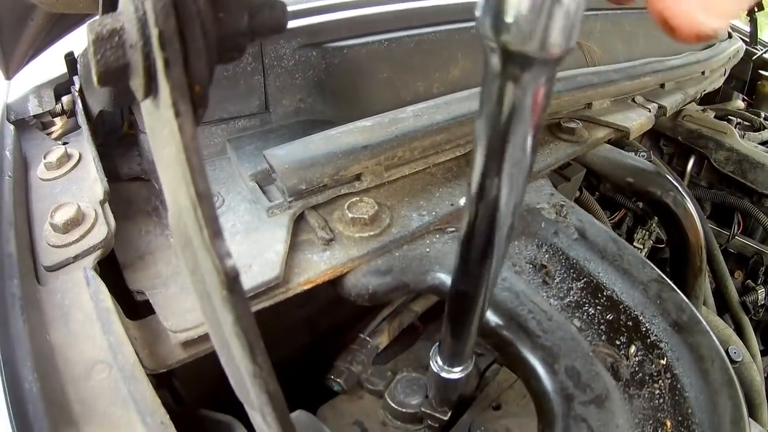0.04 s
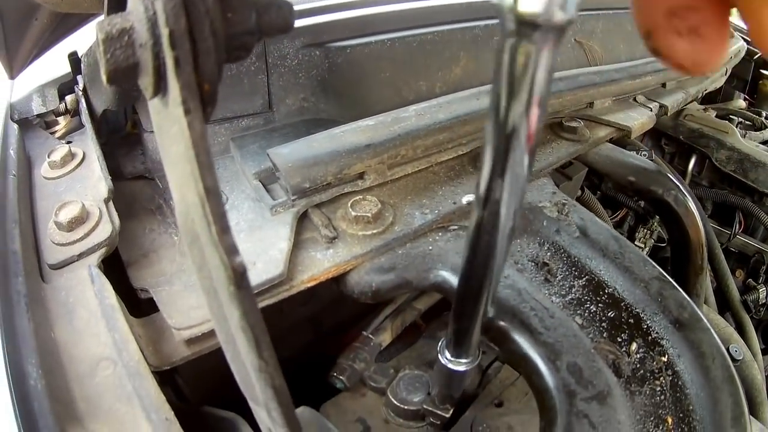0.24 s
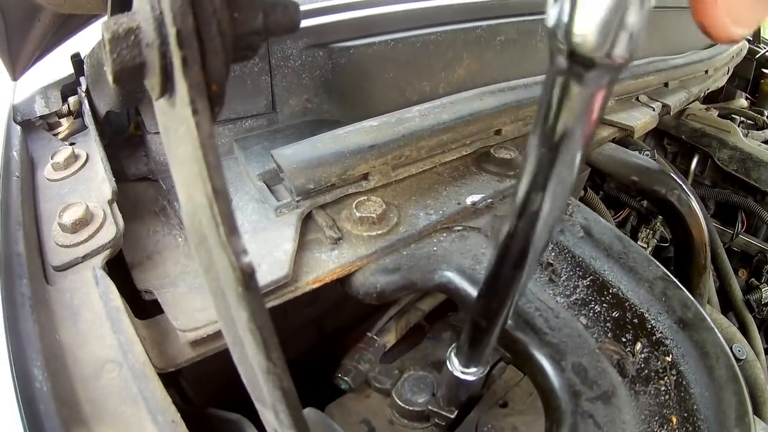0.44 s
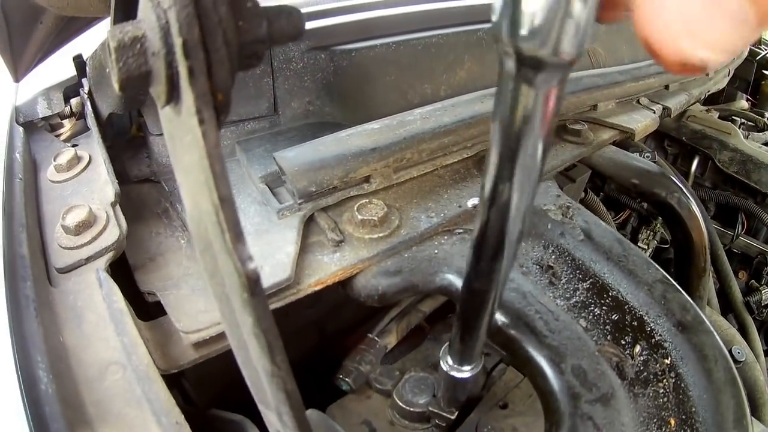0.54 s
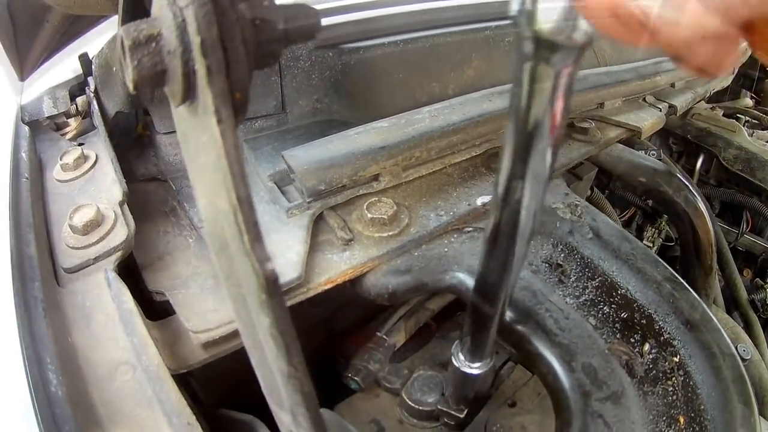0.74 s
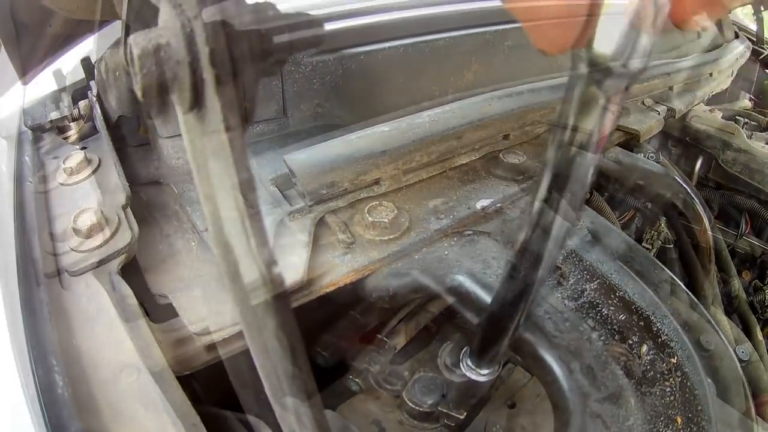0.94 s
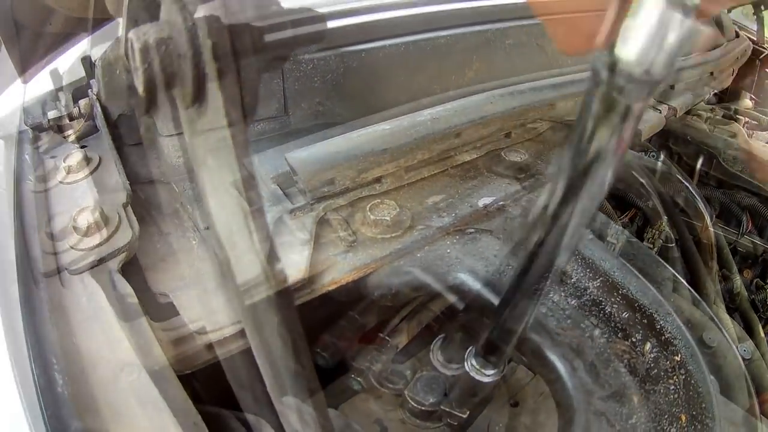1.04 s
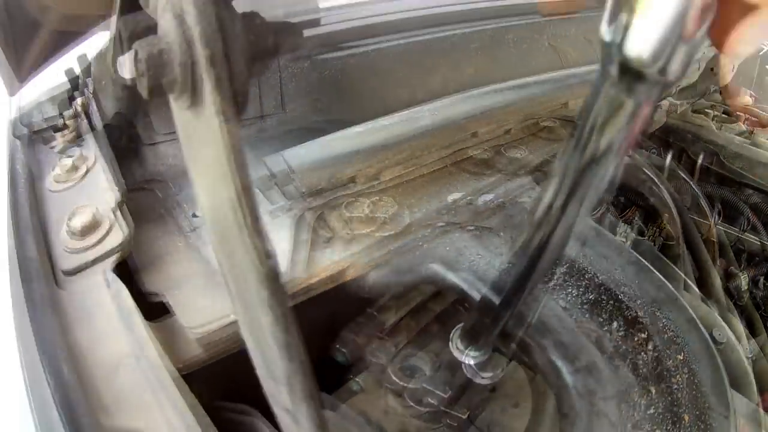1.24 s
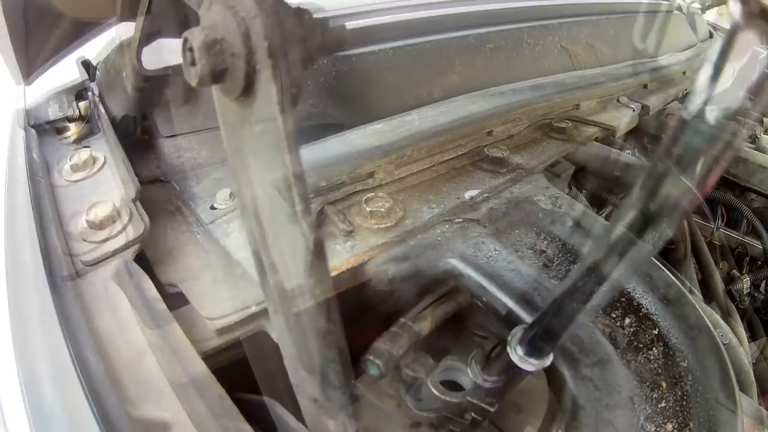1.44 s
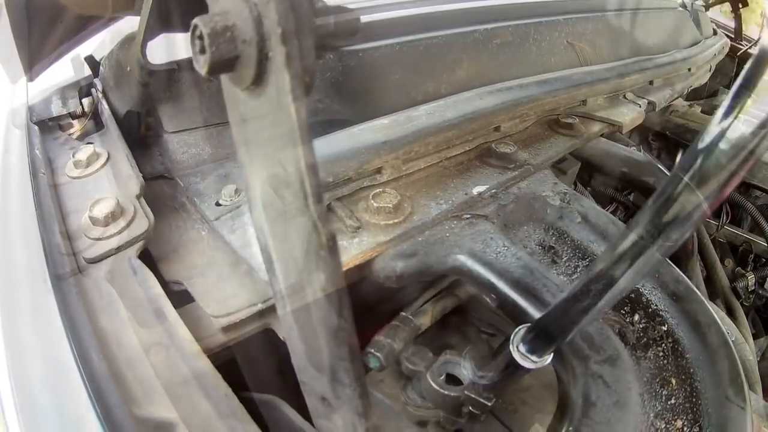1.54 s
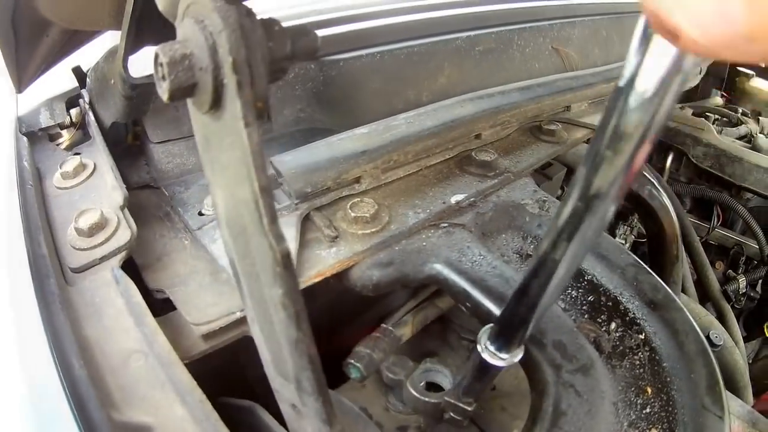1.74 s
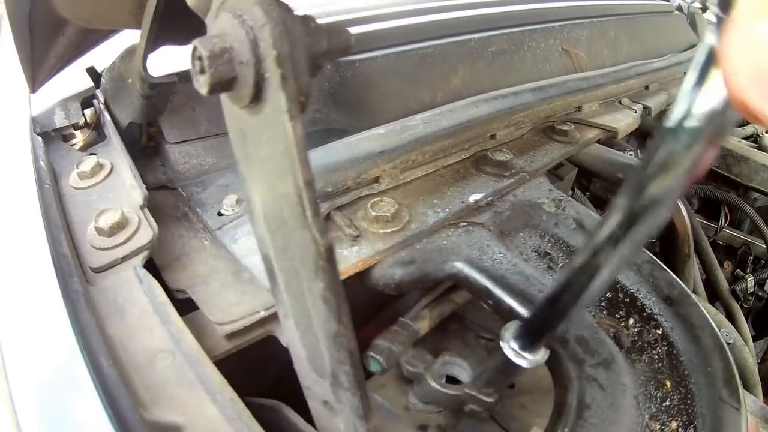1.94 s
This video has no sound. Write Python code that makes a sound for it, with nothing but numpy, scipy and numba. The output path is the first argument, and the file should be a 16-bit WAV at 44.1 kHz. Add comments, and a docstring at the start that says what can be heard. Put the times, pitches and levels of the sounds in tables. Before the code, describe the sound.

A hand ratchet clacks on a nut in an engine bay, heard close. A loud burst of hard knocks and steel ticks comes at 0.22-0.32 seconds, then near quiet; the volume drops at 0.6. Clacks follow at 0.68 and 0.83, a heavy, booming, overloaded thud at 0.98, irregular clicks and light scrapes from 1.15, stronger knocks at 1.4 and 1.95. Faint rattle, low hum, hiss, short garage reverberation.

```python
"""Ratchet in an engine bay

A hand ratchet with a long extension works a nut, close to a small microphone in a garage. Each knock of the
drive is a short pop that excites damped modes of the bodywork; some also set the large panels booming.
Loose steel parts tick and scrape as rapid impacts on the modes of the tool, and faint contacts rattle.
One heavy thud overloads the microphone; a brief reverberation, noise and a hum fill the garage.
The playback volume is turned down part-way, over a steady hiss."""
import sys
import numpy as np
from scipy import signal
from scipy.fft import rfft, irfft
from scipy.io import wavfile
from numba import njit

SR = 44100
rng = np.random.default_rng(int(sys.argv[2]) if len(sys.argv) > 2 else 0)


def store_wav(level_fs):
    """Save 16-bit WAV to argv[1]."""
    pcm = np.round(np.clip(np.atleast_2d(level_fs), -1, 1) * 32767)
    wavfile.write(sys.argv[1], SR, pcm.T.astype(np.int16))


N = 88200  # samples: two seconds

# Blow levels apply before tilt, favour and scatter; mode levels are relative within a set.
# Knocks of the drive. Each row: start in seconds, peak of the pop's envelope in dB, pop frequency in Hz,
# bodywork level in dB, bodywork tilt in dB per octave, frequency the struck spot favours in Hz, favour in dB.
KNOCKS = [(0.001, -36, 535, -45.5, -10, 567, 22), (0.147, -55, 920, -47, -7.5, 750, 2),
          (0.2228, -5, 1427, -16.5, 2.5, 519, 5.5), (0.2267, -9, 1230, -18, 4.5, 1177, 6),
          (0.2321, -14, 1440, -22, 3.5, 1440, 4), (0.2500, -16, 930, -25.5, -0.5, 560, -5),
          (0.2930, -28, 1440, -33, -4.5, 750, 10.5), (0.3230, -29.5, 1360, -37.5, -6.5, 1440, 1),
          (0.6789, -9.5, 1342, -20, 0.5, 748, 13), (0.7100, -21.5, 1440, -25.5, 5, 1420, 1),
          (0.7500, -59, 770, -36.5, -1.5, 748, 19.5), (0.8070, -32, 1520, -38.5, 9, 748, 10),
          (0.8349, -7, 1542, -22.5, -4.5, 770, 18.5), (0.9820, 8.5, 358, -3.5, -2, 510, -1),
          (0.9900, -4, 966, -11.5, 2, 1074, 4), (1.0070, -2, 976, -10.5, 0.5, 604, 17),
          (1.1470, -31.5, 1370, -36.5, -1, 750, 7.5), (1.2100, -45, 1513, -42, 0, 1440, -1),
          (1.2570, -29.5, 1430, -36, 1.5, 750, 3), (1.2910, -17, 1280, -25.5, -2, 770, 9),
          (1.3230, -25.5, 1440, -34.5, 6.5, 750, 14), (1.371, -29.5, 1440, -33, -2, 750, -7),
          (1.402, -2.5, 1325, -15, 3.5, 1060, -1), (1.4370, -24.5, 1350, -26.5, -4.5, 1440, 11),
          (1.4960, -20, 1300, -27.5, 2, 1340, 12), (1.5170, -24, 1326, -32, -2, 750, -4),
          (1.5720, -23.5, 1400, -25.5, -2, 750, 0), (1.6730, -42, 1800, -40.5, -1, 1840, 4),
          (1.7090, -36.5, 1200, -36.5, -2.5, 560, 4), (1.7510, -28.5, 1340, -37, -4.5, 750, 11),
          (1.8120, -32, 1190, -33.5, 1, 1190, 4), (1.83, -23, 1410, -28.5, 3.5, 750, 3.5),
          (1.8640, -26, 1170, -27, -2, 480, 3), (1.9000, -26.5, 1280, -37.5, 7, 750, 3),
          (1.9450, -1.5, 1310, -11, 1, 900, 6), (1.9590, -6.5, 904, -29, -3.5, 770, -3),
          (1.9910, -39, 900, -25.5, -6.5, 480, 0)]
POP_PEAK_S, POP_SHARPNESS = .0013, 3.6
# Clear modes of the bodywork. Each row: frequency in Hz, level in dB, decay by 60 dB in seconds.
BODY_MODES = [(470.3, -7, 0.13), (531, -5, 0.11), (578.3, -2, 0.043), (604.3, -8, 0.12), (680, -10.5, .15),
              (747.2, 0, 0.097), (781.2, -3, 0.099), (896.4, -5.5, 0.2), (936.5, -4, 0.084),
              (1081.7, -3.5, 0.17), (1189, -6, 0.13), (1376, -12.5, .11), (1453, -9, 0.27), (1577, -9, .1),
              (1690, -21.5, 0.065), (1940, -13.5, 0.089)]
# Outline of the dense modes among them. Each row: frequency in Hz, level in dB, decay by 60 dB in seconds.
BODY_DENSE = [(80.22, -32, 0.25), (170, -24.5, 0.5), (323, -18, 0.32), (604, -9, 0.21), (1160, -17, 0.18),
              (1760, -18.5, 0.15), (2360, -26, 0.05), (3500, -30, 0.082), (5000, -38, 0.047),
              (6742, -50.5, 0.028)]
BODY_RISE_S, BODY_DETUNE = 0.0018, 0.0079  # detuning as a fraction of frequency
BODY_CLEAR_SCATTER_DB, BODY_DENSE_SCATTER_DB = 1, 5.5  # change from blow to blow
SPOT_OCTAVES = .07  # distance at which a spot's favour falls to 1/e

# Booms of the large panels. Each row: start in seconds, level in dB, tilt in dB per octave.
BOOMS = [(0.001, -42, -9), (0.148, -54, 11), (0.223, -37.5, 17), (0.251, -35.5, -10.5), (0.292, -44, -4),
         (0.838, -27.5, -7), (0.854, -34.5, 12), (0.982, -5, 6), (1.029, -14.5, -1), (1.405, -35.5, 10),
         (1.944, -26.5, 10)]
# Modes of the large panels. Each row: frequency in Hz, level in dB, decay by 60 dB in seconds.
PANEL_MODES = [(90.8, -21, 0.1), (111.7, -4, 0.3), (123.5, -2, 0.59), (164.8, -10.5, 0.35),
               (202, -6.5, 0.29), (231.4, 3.5, 0.24), (278.7, 5, 0.17), (318.6, 0.5, 0.24),
               (359.6, 1.5, 0.1)]
PANEL_RISE_S = 0.0026

# Ticks of loose steel parts. Each row: start in seconds, level in dB, tilt in dB per octave,
# frequency the struck spot favours in Hz, favour in dB.
TICKS = [(0.2228, -32.5, -2, 4380, 10), (0.244, -27.5, -0.5, 2394, 8), (0.253, -32, 0, 4770, 10),
         (0.2604, -26, 1.5, 3784, -2), (0.268, -46, 9, 1972, 4), (0.2868, -35, 0.5, 4800, 6),
         (0.293, -43.5, -9.5, 2394, 4), (0.323, -49, -14.5, 3784, 6), (0.367, -48.5, -5, 3784, 8),
         (0.386, -53.5, -4, 2394, 7.5), (0.678, -33.5, -3.5, 4450, 5), (0.697, -29, 0, 2394, 6),
         (0.7102, -31, 1, 2394, 11), (0.721, -33, 3.5, 1960, 11), (0.727, -44, 6.5, 8860, 3),
         (0.739, -42, -7, 2394, 5), (0.755, -43, 4, 5500, 3), (0.7933, -39.5, 1.5, 1972, 9),
         (0.835, -30.5, -8.5, 1960, 6), (0.853, -37.5, 5, 4770, 6), (0.918, -54, -9, 4430, 9),
         (1.008, -24, -6.5, 2394, 1), (1.324, -46, -6, 4393, 9), (1.349, -56, -8, 2394, 7),
         (1.4033, -28.5, -2, 4393, 8), (1.431, -41.5, 3, 4770, 6), (1.454, -49, 5, 8860, -1),
         (1.464, -43.5, -5, 4393, 9), (1.4733, -42.5, 3.5, 4770, 7), (1.553, -43.5, 0.5, 1972, 13),
         (1.5697, -39.5, -1, 4370, 14), (1.614, -48.5, 3, 4750, 7), (1.627, -49.5, -5, 4750, 10),
         (1.6375, -50, -1, 4800, 5), (1.752, -58.5, -6, 2394, 10), (1.8313, -40, -8.5, 4393, 10.5),
         (1.865, -45, -6.5, 3185, 9), (1.885, -54.5, -11, 2394, 13), (1.945, -36.5, -1, 3185, 16),
         (1.9598, -41, -6, 3784, -4)]
# Clear modes of ratchet and extension. Each row: frequency in Hz, level in dB, decay by 60 dB in seconds.
TOOL_MODES = [(1950, 5.5, 0.019), (2388, 3.5, 0.013), (3202, -6, 0.035), (3770, -4.5, 0.048),
              (4340, -3, 0.027), (4683, -6, 0.022), (5390, -14, 0.087), (7310, -12, 0.046),
              (8720, -3.5, 0.017), (10950, -5, 0.025), (11510, -8, 0.015)]
# Outline of the tool's short dense modes. Each row: frequency in Hz, level in dB, decay by 60 dB in seconds.
TOOL_DENSE = [(1633, -12, .02), (2330, -10, 0.0074), (4500, -8, 0.026), (6360, -10, 0.027),
              (8000, -25.5, 0.012), (9000, -8.5, 0.032), (11500, -4, .014), (12800, -14.5, .014),
              (15130, -16, .014)]
TOOL_SCATTER_DB, TOOL_DETUNE, TOOL_RISE_S = 3, 0.018, 0.00011
CHATTER_S = .0012  # longest gap between the contacts of one tick

# Steel sliding on steel. Each row: start in seconds, length in seconds, level in dB.
SCRAPES = [(0.221, .05, -33.5), (0.279, .022, -46), (0.361, .035, -62), (0.675, .09, -43),
           (0.831, 0.045, -42), (0.979, .043, -29.5), (1.022, .08, -48.5), (1.254, .1, -61.5),
           (1.362, .155, -46), (1.516, .13, -63), (1.825, .1, -55.5), (1.929, .07, -44)]
SCRAPE_PER_S, SCRAPE_SPREAD_DB, SCRAPE_TILT_DB = 900, 2.1, -3.5  # tilt per octave
SCRAPE_RISE_S, SCRAPE_FADE_DB = 0.0057, 11  # the fade is complete at the end of a slide

RATTLE_PER_S, RATTLE_DB, RATTLE_SPREAD_DB = 80, -59.5, 5.5  # faint random nudges
RATTLE_T60_S = .04  # longest decay, damped by the hand

ROOM_DB, ROOM_DELAY_S, ROOM_SPLIT_HZ = -16, 0.0068, 2500
ROOM_T60_S, ROOM_TREBLE_T60_S = 0.27, 0.11

# Spectrum of the garage noise. Each row: frequency in Hz, relative density in dB per Hz.
GARAGE = [(15, -57.5), (25, -4), (119, -5), (178, -22.5), (289, -8), (469, -27), (782, -19.5), (848, -24),
          (1410, -29), (1950, -35.5), (15500, -53.5)]
GARAGE_DB, HUM_HZ, HUM_WIDTH_HZ, HUM_DB = -51, 117, 14, -55

CLIP, CLIP_KNEE = .66, 7  # limiting amplitude, and hardness of the approach to it
TURN_DOWN_S, TURN_DOWN_DB = .605, -15.5
# Spectrum of the hiss. Each row: frequency in Hz, relative density in dB per Hz.
HISS = [(20, -10), (60, -17.5), (400, -17.5), (3000, -36.5), (13000, -46), (15000, -52.5)]
HISS_DB, TOP_HZ = -71.5, 15500


def undb(db):
    """Decibels are a logarithmic ratio; return the amplitude ratio."""
    return 10 ** (np.asarray(db) / 20)


@njit
def ring(n, starts, gains, poles, rise):
    """Superposition of damped modes: each blow swells every mode in, and it runs until it has died away."""
    out = np.zeros(n)
    for e in range(len(starts)):
        for m in range(gains.shape[1]):
            z, p, r = gains[e, m], poles[e, m], 1.
            stop = min(n, starts[e] + int(-8. / np.log(abs(p))))
            for i in range(starts[e], stop):
                out[i] += z.imag * (1 - r)
                z *= p
                r *= rise
    return out


def strike(t, db, tilt_db, modes, pivot_hz, scatter_db, detune, rise_s, spot_db=0):
    """Modal excitation: each blow gives every mode a random strength, phase and slight detuning."""
    hz, mode_db, t60 = modes
    chance = rng.standard_normal((len(t), 3 * len(hz))).reshape(len(t), 3, -1)
    tilt = np.reshape(tilt_db, (-1, 1)) * np.log2(hz / pivot_hz)
    gain = undb(db[:, None] + mode_db + spot_db + tilt + scatter_db * chance[:, 0])
    gain = gain / np.sqrt(np.sum(undb(mode_db) ** 2))
    gain = gain * np.exp(2j * np.pi * chance[:, 2])
    turn = 2j * np.pi * hz * (1 + detune * chance[:, 1]) / SR
    decay = np.log(1000) / (np.maximum(t60, .004) * SR)
    starts = (t * SR).astype(np.int64)
    return ring(N, starts, gain, np.exp(turn - decay), np.exp(-1 / (rise_s * SR)))


def modes_of(clear, dense, count):
    """Modal density: a few clear modes stand in a crowd spread over log frequency."""
    hz, db, t60 = np.array(dense).T
    f = np.linspace(np.log(hz[0]), np.log(hz[-1]), num=count)
    f = f + 0.01463 * rng.standard_normal(count)
    crowd = [np.exp(f), np.interp(f, np.log(hz), db), np.interp(f, np.log(hz), t60)]
    return np.hstack([np.array(clear).T, crowd])


def favour(modes, clear, spot_hz, spot_db):
    """The point of excitation weights the modes: clear ones near one frequency are changed most."""
    near = np.exp(-(np.log2(modes[0] / spot_hz[:, None]) / SPOT_OCTAVES) ** 2)
    is_clear = np.arange(modes.shape[1]) < len(clear)
    return is_clear * spot_db[:, None] * near


def knocks(body):
    """Impact and resonance: a pop of a few cycles, with the modes of the bodywork swelling in behind it."""
    t, pop_db, pop_hz, body_db, tilt_db, spot_hz, spot_db = np.array(KNOCKS).T
    pops, u = np.zeros(N + 600), np.arange(600) / SR
    envelope = (u / POP_PEAK_S * np.exp(1 - u / POP_PEAK_S)) ** POP_SHARPNESS
    for start, db, hz in zip(t, pop_db, pop_hz):
        i = int(start * SR)
        pops[i:i + 600] += undb(db) * envelope * np.sin(2 * np.pi * hz * u)
    clear = np.arange(body.shape[1]) < len(BODY_MODES)
    scatter_db = np.where(clear, BODY_CLEAR_SCATTER_DB, BODY_DENSE_SCATTER_DB)
    spot = favour(body, BODY_MODES, spot_hz, spot_db)
    ringing = strike(t, body_db, tilt_db, body, 800., scatter_db, BODY_DETUNE, BODY_RISE_S, spot)
    return pops[:N] + ringing


def booms():
    """Low modes of large plates: the big panels swell in more slowly than the bodywork and hum low."""
    t, db, tilt_db = np.array(BOOMS).T
    return strike(t, db, tilt_db, np.array(PANEL_MODES).T, 220.0, 2.15, 0.021, PANEL_RISE_S)


def ticks(tool):
    """Contact chatter: each tick is three quick contacts that ring the tool."""
    t, db, tilt_db, spot_hz, spot_db = np.repeat(np.array(TICKS), 3, axis=0).T
    gaps = rng.random((len(TICKS), 3))
    t = t + CHATTER_S * gaps.cumsum(axis=1).ravel() - CHATTER_S / 2
    spot = favour(tool, TOOL_MODES, spot_hz, spot_db)
    return strike(t, db, tilt_db, tool, 4100.0, TOOL_SCATTER_DB, TOOL_DETUNE, TOOL_RISE_S, spot)


def scrapes(tool):
    """Friction as a dense train of tiny random impacts while the parts slide."""
    chance = rng.random((int(SCRAPE_PER_S * N / SR), 2))
    t, db = chance[:, 0] * N / SR, np.full(len(chance), -np.inf)
    for start, length, scrape_db in SCRAPES:
        now = (t > start) & (t < start + length)
        since = t[now] - start
        onset_db = 20 * np.log10(1 - np.exp(-since / SCRAPE_RISE_S))
        db[now] = scrape_db - SCRAPE_FADE_DB * since / length + onset_db
    db = db - SCRAPE_SPREAD_DB * np.log(chance[:, 1])
    on = np.isfinite(db)
    return strike(t[on], db[on], SCRAPE_TILT_DB, tool, 3500.0, TOOL_SCATTER_DB, .03, TOOL_RISE_S)


def rattle(body):
    """Added damping: hands and tool shift softly against the metal all the time and shorten its ringing."""
    chance = rng.random((int(RATTLE_PER_S * N / SR), 2))
    db = RATTLE_DB - RATTLE_SPREAD_DB * np.log(chance[:, 1])
    # every second mode of the bodywork
    held = np.vstack([body[:2, ::2], np.minimum(body[2, ::2], RATTLE_T60_S)])
    return strike(chance[:, 0] * N / SR, db, -2.5, held, 560.0, 3.5, 0.03, BODY_RISE_S)


def room(x):
    """Reverberation: the garage answers with a short diffuse decay that loses its treble first."""
    u, noise = np.arange(SR // 2) / SR, rng.standard_normal(SR // 2)
    low = signal.lfilter(*signal.butter(2, ROOM_SPLIT_HZ, fs=SR), noise)
    tail = low * undb(-60 * u / ROOM_T60_S) + (noise - low) * undb(-60 * u / ROOM_TREBLE_T60_S)
    tail = tail * (u > ROOM_DELAY_S)
    return signal.fftconvolve(x, tail * undb(ROOM_DB) / np.sqrt(np.sum(tail ** 2)))[:N]


def level(x, db):
    """Effective value: scale a signal to a root-mean-square level."""
    return x * undb(db) / np.sqrt(np.mean(x ** 2))


def coloured(table):
    """Spectral shaping: white noise is weighted by the given spectrum."""
    hz, db = np.array(table).T
    f = np.maximum(np.arange(N // 2 + 1) * SR / N, 1)
    weight = undb(np.interp(np.log(f), np.log(hz), db))
    return irfft(rfft(rng.standard_normal(N)) * weight, N)


def garage():
    """Narrow-band noise fluctuates: an unsteady mains hum stands in broad room noise."""
    resonance = signal.iirpeak(HUM_HZ, HUM_HZ / HUM_WIDTH_HZ, fs=SR)
    hum = signal.lfilter(*resonance, rng.standard_normal(N))
    return level(coloured(GARAGE), GARAGE_DB) + level(hum, HUM_DB)


def scene():
    """Superposition of the near sources, their reverberation and the garage."""
    body = modes_of(BODY_MODES, BODY_DENSE, count=90)
    tool = modes_of(TOOL_MODES, TOOL_DENSE, count=30)
    near = knocks(body) + booms() + ticks(tool) + scrapes(tool) + rattle(body)
    return (near + room(near) + garage())[None]


def record(dry):
    """Saturation with a tight knee; the volume then steps down over a steady hiss, and the top is cut."""
    step = np.clip((np.arange(N) / SR - TURN_DOWN_S) / 0.008, 0, 1)
    gain = undb(TURN_DOWN_DB * step)
    hiss = level(coloured(HISS), HISS_DB)
    clipped = dry / (1 + np.abs(dry / CLIP) ** CLIP_KNEE) ** (1 / CLIP_KNEE)
    top_cut = signal.ellip(8, .2, 70, TOP_HZ, fs=SR, output="sos")
    return signal.sosfilt(top_cut, gain * clipped + hiss)


dry = scene()
out = record(dry)
store_wav(out)
```